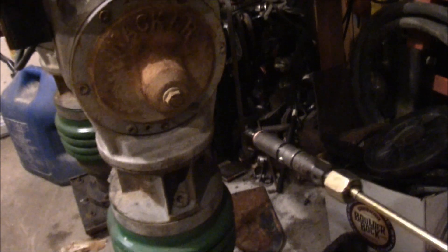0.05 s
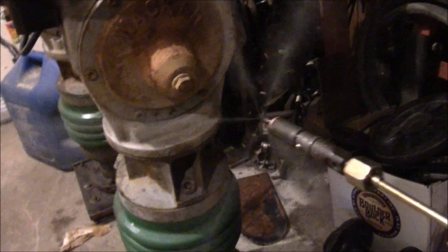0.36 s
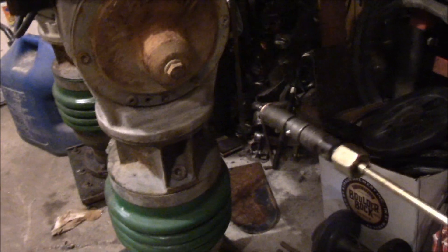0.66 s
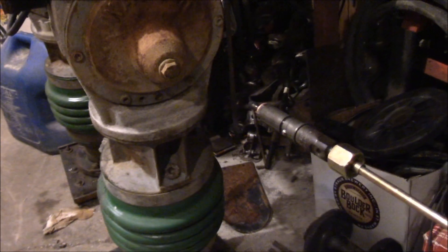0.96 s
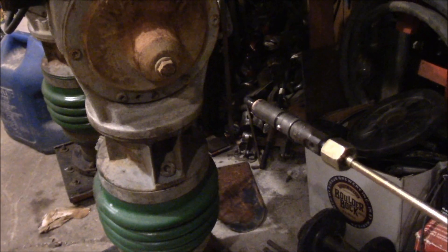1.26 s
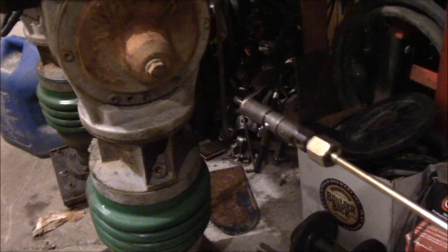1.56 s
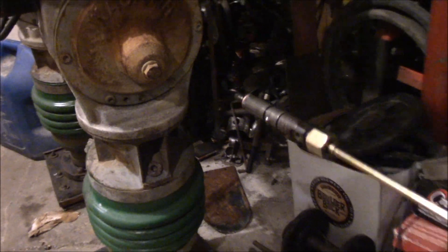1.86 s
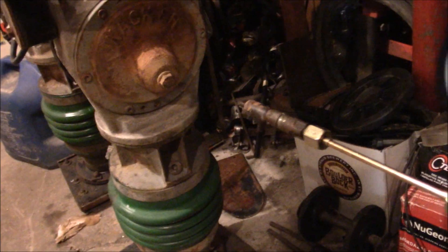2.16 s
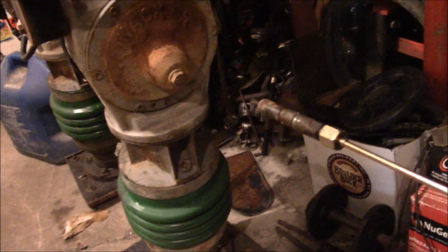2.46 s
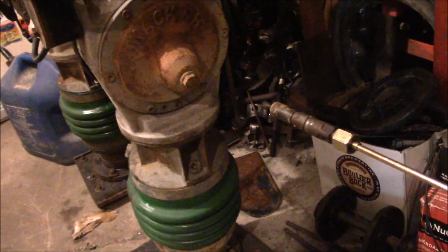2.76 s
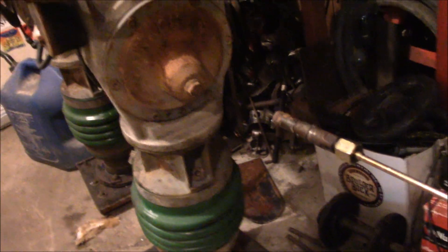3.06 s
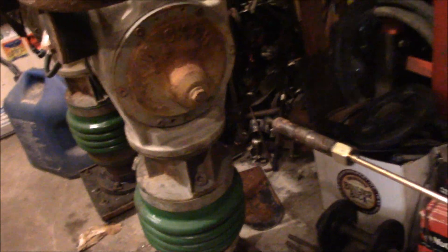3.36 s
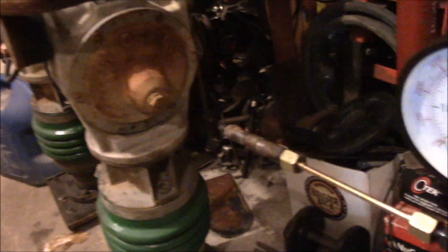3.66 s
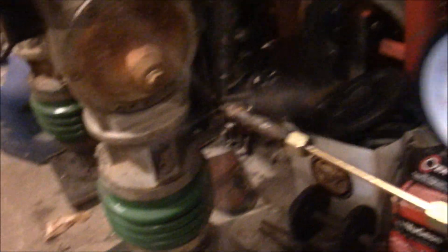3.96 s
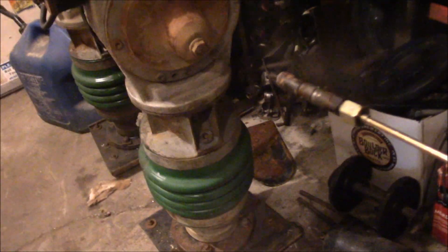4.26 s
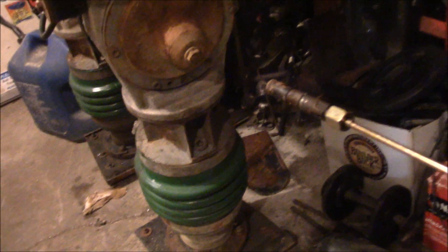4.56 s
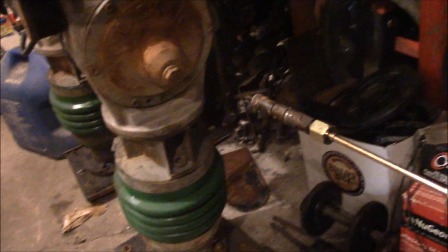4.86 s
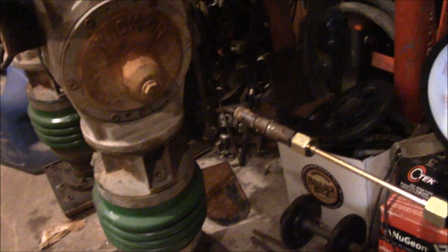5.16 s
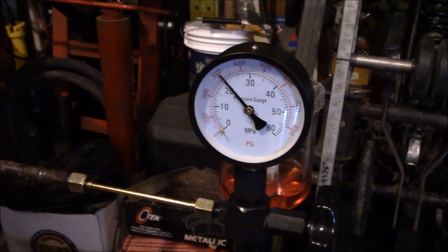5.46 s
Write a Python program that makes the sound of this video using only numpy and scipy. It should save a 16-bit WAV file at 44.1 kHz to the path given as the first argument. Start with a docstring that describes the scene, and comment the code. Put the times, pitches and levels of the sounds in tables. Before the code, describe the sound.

In a small workshop, a diesel injector on a hand-lever tester fires two sharp metallic pops in quick succession, each with a hiss of fuel. The lever then ticks softly and gives a light clank with a tiny squeak. Near the end seven pops rattle out in a fast, hissing burst, the last the hardest, and the steel rings faintly on. The sound is close, over a quiet room hush.

```python
"""Two sharp, hissing pops, later seven in a row: a diesel injector on a hand-lever tester in a small workshop.
Each time the needle snaps open, the impulse excites the modes of the steel body and a jet of fuel hisses.
The needle rebounds softly on its seat; the lightly damped pipe and valve spring ring on.
Between the strokes, impact and friction make the lever tick, clank and squeak over a steady room hush.
A limiter holds the peaks."""
import sys
import numpy as np
from scipy import signal
from scipy.fft import rfft, irfft, next_fast_len
from scipy.io import wavfile
from scipy.ndimage import uniform_filter1d, minimum_filter1d

SR = 44100
rng = np.random.default_rng(int(sys.argv[2]) if len(sys.argv) > 2 else 0)


def master(y):
    """Save y as 16-bit WAV."""
    cut = np.clip(np.atleast_2d(y).T, -1, 1)
    pcm = np.round(cut * 32767)  # scale
    wavfile.write(sys.argv[1], SR, pcm.astype(np.int16))


N = 251925
T = np.arange(SR // 2) / SR  # time since a blow [s]

# needle snaps: (time [s], hardness [dB])
NEEDLE_POPS = [(0.2638, 1), (0.3132, 1.5), (3.9016, -0.5), (3.94, -3), (3.9784, 3.5), (4.0166, -2),
               (4.0452, 0), (4.079, -2), (4.1198, 11)]
# spectrum of the snap: (frequency [Hz], relative density [dB])
SNAP_SPECTRUM = [(60, -47), (250, -18.5), (600, 5.5), (1000, -33), (1350, -4), (1700, 4.5), (2200, -8.5),
                 (3000, -5), (5000, -12), (7000, -14), (9500, -16), (12000, -30), (16000, -37)]
# spectrum of the fuel spray: (frequency [Hz], relative density [dB])
SPRAY_SPECTRUM = [(60, -26), (130, -29), (230, -2.5), (420, -9.5), (750, -3), (950, -3.5), (1700, -2.5),
                  (2400, -1), (2900, -11), (5000, -12.5), (7000, -19.5), (10000, -25), (13000, -31),
                  (16000, -53)]
def injector(phases, alike=0.5, usual_gap_s=0.037):
    """Impulse response: pops take the same paths through steel and room, so part of each repeats."""
    out = np.zeros(N)
    same_snap, same_spray = coloured(SNAP_SPECTRUM), coloured(SPRAY_SPECTRUM)
    kept, new = np.sqrt([alike, 1 - alike])
    kick = nozzle_kick()
    # faster pumping brings a pop sooner and makes it spray and ring more
    gaps = np.diff([s for s, _ in NEEDLE_POPS], prepend=0)
    flows_db = np.where(gaps < 2 * usual_gap_s, 0.9 * 20 * np.log10(usual_gap_s / gaps), 0)
    for (s, hard_db), flow_db in zip(NEEDLE_POPS, flows_db):
        snap_noise = kept * same_snap + new * coloured(SNAP_SPECTRUM)
        snap = amp(-14 + hard_db) * crack(snap_noise, length_s=0.0044)
        jolt = amp(-9.5 + 0.25 * hard_db) * kick
        near_echoes = amp(-28 + hard_db) * coloured(SNAP_SPECTRUM) * fade(T, 0.06)
        spray = amp(-19 + flow_db) * reverberant(kept * same_spray + new * coloured(SPRAY_SPECTRUM))
        ring = amp(-21.5 + flow_db + 0.14 * hard_db) * body_ring(phases, scatter_db=1, detune=0.00223)
        add(out, s, snap + jolt + (near_echoes + spray + ring) * rise(T, 0.0038))
    return out


# nozzle holder modes: (frequency [Hz], relative level [dB], decay time T60 [s])
NOZZLE_MODES = [(249, -4, 0.02), (576, -10.5, 0.028), (1669, -2, 0.025), (2215, -5.5, 0.076)]
def nozzle_kick():
    """Transient response: collapsing line pressure kicks the holder's heavily damped modes."""
    modes = sum(amp(db) * np.sin(2 * np.pi * hz * T) * fade(T, t60) for hz, db, t60 in NOZZLE_MODES)
    return modes * rise(T, 0.00058) ** 2


# injector body and pipe modes: (frequency [Hz], relative level [dB], decay time T60 [s])
BODY_MODES = [(143, -20, 0.26), (211, -19.5, 0.12), (255.8, -10, 0.16), (279.7, -10, .2), (337, -8, 0.24),
              (501.5, -7, 0.22), (734, -6.5, .28), (792, -8, 0.19), (1059, -1, 0.13), (1108, -3.5, 0.13),
              (1225, 0, 0.062), (1276, -3, 0.25), (1620, -22, 0.15), (1700, -6, 0.094), (1701, -5.5, 0.2),
              (1982, -1.5, 0.23), (2050, -7, 0.25), (2228, -3, 0.18), (2280, -7, 0.19), (2670, -9, 0.16),
              (2610, -5, 0.2), (3070, -18, 0.31), (3400, -17, 0.22), (3944, -12, 0.17), (3986, -11, 0.14),
              (4310, -15, 0.22), (4896, -12.5, 0.23), (6070, -15, 0.19), (6430, -19, 0.22)]
def body_ring(phases, scatter_db, detune):
    """Modal superposition: damped sinusoids of the steel, varying in level and pitch with each blow."""
    hz, db, t60 = np.transpose(BODY_MODES)[:, :, None]
    strength, shift = rng.standard_normal((2, len(BODY_MODES), 1))
    envelopes = amp(db + scatter_db * strength) * fade(T, t60)
    cycles = hz * (1 + detune * shift) * T + phases
    return np.sum(envelopes * np.sin(2 * np.pi * cycles), axis=0)


# pump strokes: (first pop [s], last pop [s], loss per bounce [dB],
# pipe frequency [Hz], pipe level [dB], spring gain [dB])
PUMP_STROKES = [(.2639, .3133, 14, 323, -40.5, -48), (3.9017, 4.1202, 3.5, 334.6, -47.5, -39.5)]
def needle_rebounds(phases, count=4, gap_s=0.0398):
    """Inelastic impact: after a stroke the needle bounces on its seat, evenly paced and ever softer."""
    out = np.zeros(N)
    for _, last_s, loss_db, *_ in PUMP_STROKES:
        for k in range(count):
            hiss = amp(-21.5) * reverberant(coloured(SPRAY_SPECTRUM)) * fade(T, 0.23)
            ring = amp(-23.5) * body_ring(phases, scatter_db=3.5, detune=0.003) * fade(T, 0.4)
            bounce = amp(-8 - k * loss_db) * (hiss + ring) * rise(T, 0.00094)
            add(out, last_s + (k + 1) * gap_s, bounce)
    return out


# valve spring modes: (frequency [Hz], relative level [dB], decay time T60 [s])
SPRING_MODES = [(633, -13.5, 4.6), (861, -20, 1.8), (1086, 1, 2.67), (1272, -1, 0.98), (1975, -4, .7)]
def pipe_and_spring(pipe_t60=4.28):
    """Free vibration: slender, lightly damped steel parts sing on after each stroke."""
    out, t = np.zeros(N), np.arange(N) / SR
    tone = lambda hz, t60: np.sqrt(2) * np.sin(2 * np.pi * hz * t) * fade(t, t60) * rise(t, 0.0095)
    spring = sum(amp(db) * tone(hz, t60) for hz, db, t60 in SPRING_MODES)
    for first_s, last_s, _, pipe_hz, pipe_db, spring_db in PUMP_STROKES:
        add(out, (first_s + last_s) / 2, amp(pipe_db) * tone(pipe_hz, pipe_t60) + amp(spring_db) * spring)
    return out


# knocks and ticks of lever and pump: (time [s], level [dB], centre frequency [Hz])
LINKAGE_KNOCKS = [(1.5, -52, 4400), (1.7638, -45, 1040), (1.8675, -37, 4700), (2.0484, -52, 2840),
                  (2.6043, -34, 1560), (2.692, -60.5, 7500), (3.262, -51.5, 1750), (3.3386, -34, 414),
                  (3.4532, -42.5, 400)]
def linkage_knocks():
    """Backlash: the linkage rubs as it takes up slack, then makes contact, and the room echoes."""
    out = np.zeros(N)
    for s, db, centre_hz in LINKAGE_KNOCKS:
        colour = hump(centre_hz, octaves=0.69)
        echo = amp(-9) * reverberant(noise(colour)) * rise(T, 0.002)
        rub = amp(db - 20.5) * noise(colour) * fade(T[::-1], 0.49)  # swells up to the knock
        add(out, s - T[-1], rub)
        add(out, s, amp(db) * (crack(noise(colour), length_s=0.0052) + echo))
    return out


# spectrum of the struck lever: (frequency [Hz], relative density [dB])
LEVER_SPECTRUM = [(59, -58), (100, -26), (322, -32), (398, -3), (662, -5.5), (854, -2.5), (1170, -14),
                  (1480, -2.5), (2370, -21), (2630, -9.5), (4870, -23.5), (5530, -19), (6020, -23),
                  (12100, -37), (16000, -52)]
def lever_clank(stop_s=2.9864, level_db=-25):
    """Contact chatter: the lever scrapes up to its stop, hits it and rattles ever more slowly."""
    out = np.zeros(N)
    scrape = amp(level_db - 9.5) * coloured(LEVER_SPECTRUM) * fade(T[::-1], 0.1)
    add(out, stop_s - T[-1], scrape)
    gaps_s = 0.0085 * 1.25 ** np.arange(8)
    for delay_s in np.append(0, np.cumsum(gaps_s)):
        drop_db = 0 if delay_s < 0.025 else 11 + 63 * delay_s  # full force, then loose and fading
        contact = 0.8 * crack(coloured(LEVER_SPECTRUM), length_s=0.0055)
        echo = 0.5 * reverberant(coloured(LEVER_SPECTRUM)) * rise(T, 0.0016)
        add(out, stop_s + delay_s, amp(level_db - drop_db) * (contact + echo))
    return out


# pivot squeaks: (time [s], frequency [Hz], peak level [dB], length [s])
PIVOT_SQUEAKS = [(2.988, 5480, -31.5, 0.022), (3.074, 4330, -44.5, 0.016)]
def pivot_squeaks():
    """Friction-induced vibration: the dry pivot gives brief tones of wavering pitch."""
    out = np.zeros(N)
    for s, hz, db, length_s in PIVOT_SQUEAKS:
        pitch = hz * (1 + 0.023 * noise(lambda f: -f / 30))
        age = 3 * T / length_s
        swell = age * np.exp(1 - age)
        add(out, s, amp(db) * swell * np.sin(2 * np.pi * np.cumsum(pitch) / SR))
    return out


# workshop reverberation: (frequency [Hz], decay time T60 [s])
ROOM_DECAY = [(100, 0.17), (400, 0.25), (1500, 0.25), (5000, .27), (12000, 0.22)]
def reverberant(x):
    """Reverberant decay: each frequency of a steady noise dies away at the rate the room gives it."""
    hz, t, spectra = signal.stft(x, SR, nperseg=256)
    decay = fade(t, along(ROOM_DECAY, hz)[:, None])
    return signal.istft(spectra * decay, SR, nperseg=256)[1][:len(x)]


# spectrum of the workshop background: (frequency [Hz], relative density [dB])
HUSH_SPECTRUM = [(15, -36), (25, -32), (60, -33), (108, -13), (145, -15), (161, -12), (249, -6), (335, -4),
                 (363, -1.5), (641, -4.5), (695, -3.5), (1020, -6.5), (1100, -8.5), (1370, -10),
                 (5730, -30), (16000, -53)]
def room_hush():
    """Stationary noise: the steady background of the workshop."""
    return amp(-51) * coloured(HUSH_SPECTRUM, size=N)


def crack(colour, length_s):
    """Time windowing: a few milliseconds of noise, with an energy set by the length alone."""
    window = rise(T, 0.0005) * np.exp(-(T / length_s) ** 4)
    burst = colour * window
    return burst * np.linalg.norm(window) / np.linalg.norm(burst)


def noise(shape_db, size=len(T)):
    """Spectral shaping: white noise filtered by a dB function of frequency, at an rms near 1."""
    white = rng.standard_normal(next_fast_len(size))
    padded = 2 * len(white)
    gain = amp(shape_db(np.fft.rfftfreq(padded, 1 / SR)))
    shaped = irfft(rfft(white, padded) * gain, padded)[:len(white)]
    return shaped[:size] * np.linalg.norm(white) / np.linalg.norm(shaped)


def coloured(points, size=len(T)):
    """Coloured noise with a tabulated spectrum."""
    return noise(lambda hz: along(points, hz), size)


def hump(centre_hz, octaves):
    """Band-pass response: a broad bump in dB, as a function of frequency."""
    return lambda hz: -20 * np.log2(1 + (np.log2((hz + 1) / centre_hz) / octaves) ** 2 / 4)


def along(points, hz):
    """Interpolation on a logarithmic frequency axis."""
    frequencies, values = np.transpose(points)
    return np.interp(np.log(hz + 1), np.log(frequencies), values)


def amp(db):
    """Decibels to amplitude ratio."""
    return 10 ** (np.asarray(db) / 20)


def rise(t, tau):
    """Exponential build-up with time constant tau."""
    return 1 - np.exp(-t / tau)


def fade(t, t60):
    """Exponential decay by 60 dB in t60."""
    return np.exp(-np.log(1000) * t / t60)


def add(track, s, sound):
    """Superposition of a sound starting at s seconds."""
    part = track[round(s * SR):][:len(sound)]
    part += sound[:len(part)]


def scene():
    """Low cut: the tester's sounds lose their deep bass, then join the room hush."""
    phases = rng.random((len(BODY_MODES), 1))  # [cycles], shared by pops and rebounds
    tester = injector(phases) + needle_rebounds(phases) + pipe_and_spring()
    tester += linkage_knocks() + lever_clank() + pivot_squeaks()
    low_cut = signal.butter(3, 95, "high", fs=SR, output="sos")
    return (signal.sosfilt(low_cut, tester) + room_hush())[None]


def record(dry, threshold_db=-6.3, bottom_hz=50, top_hz=15900):
    """Peak and band limiting: the gain dips at peaks; the deepest bass and highest treble are cut."""
    needed = np.minimum(1, amp(threshold_db) / (np.abs(dry) + 1e-9))
    gain = uniform_filter1d(minimum_filter1d(needed, size=61), size=45)
    bass_cut = signal.butter(2, bottom_hz, "high", fs=SR, output="sos")
    held = signal.sosfilt(bass_cut, dry * gain)
    return irfft(rfft(held) * (np.fft.rfftfreq(N, 1 / SR) < top_hz), N)


dry = scene()
out = record(dry)
master(out)
```